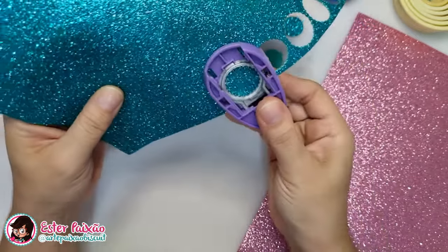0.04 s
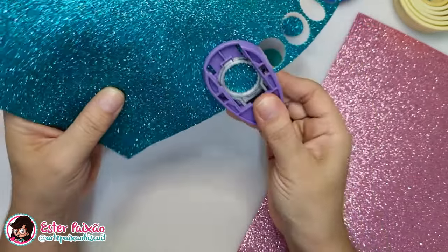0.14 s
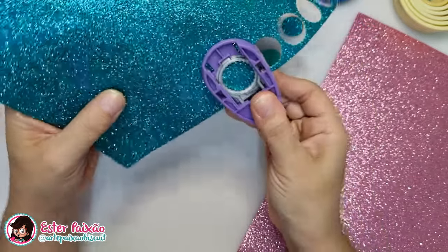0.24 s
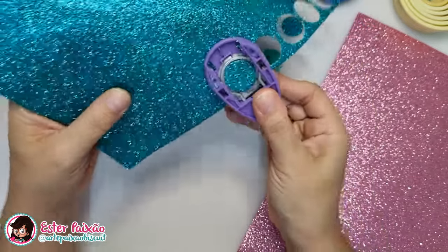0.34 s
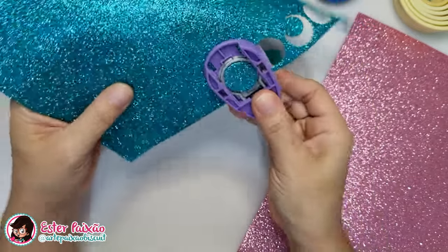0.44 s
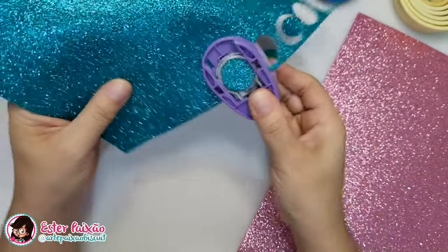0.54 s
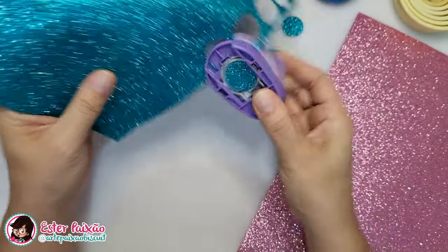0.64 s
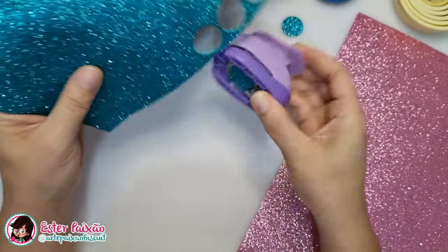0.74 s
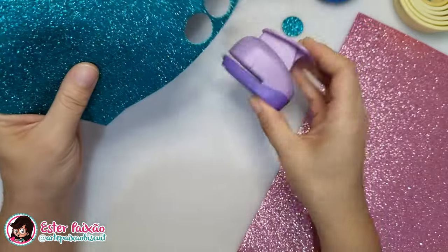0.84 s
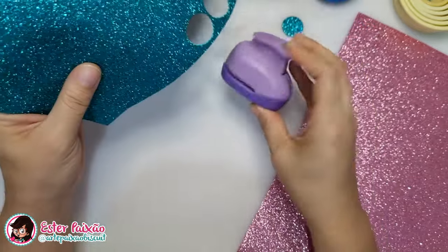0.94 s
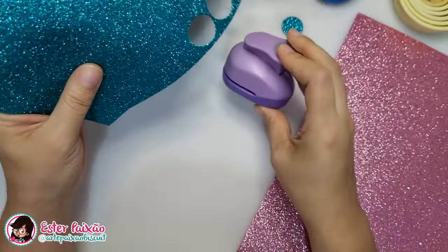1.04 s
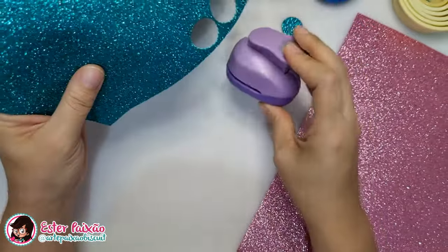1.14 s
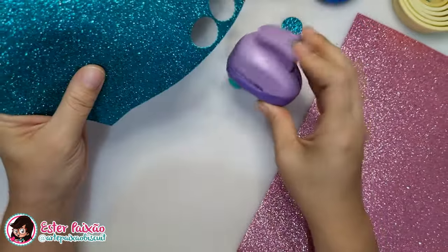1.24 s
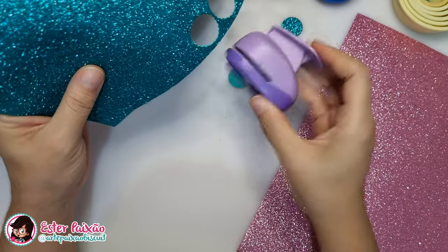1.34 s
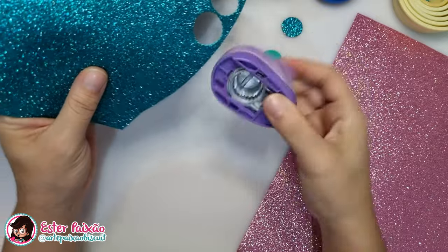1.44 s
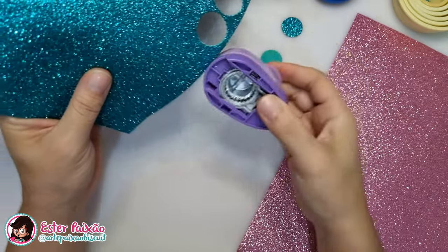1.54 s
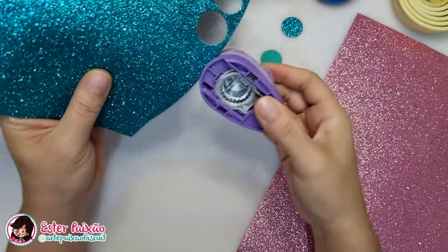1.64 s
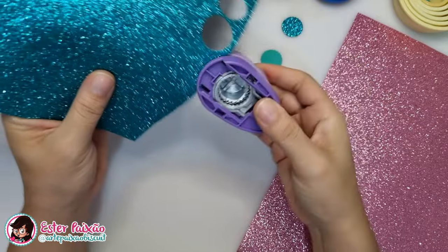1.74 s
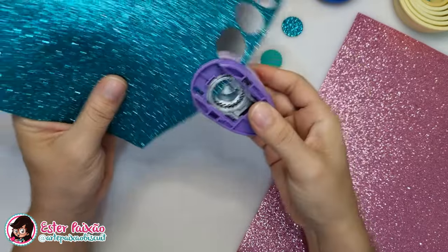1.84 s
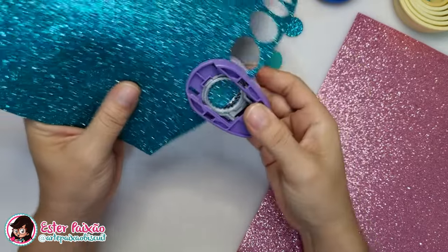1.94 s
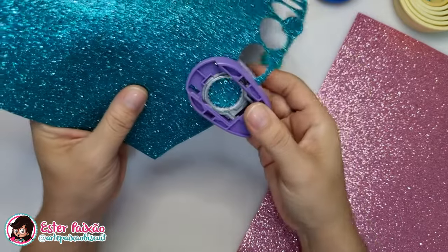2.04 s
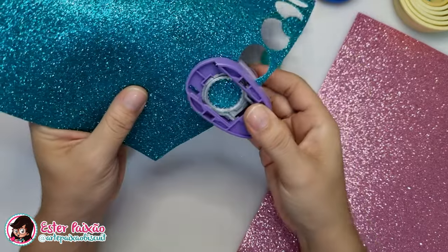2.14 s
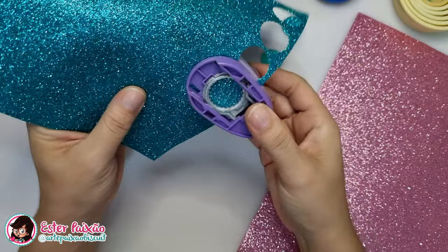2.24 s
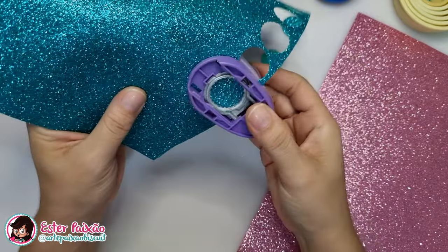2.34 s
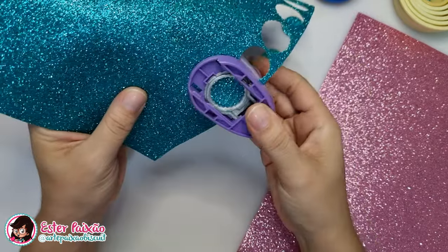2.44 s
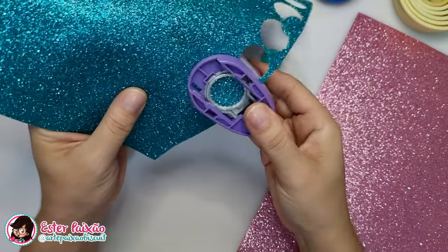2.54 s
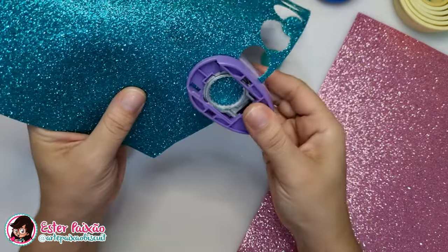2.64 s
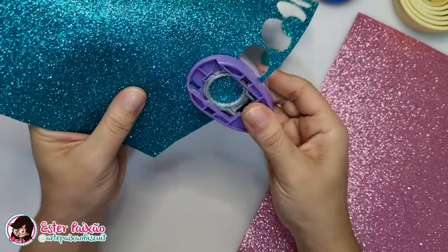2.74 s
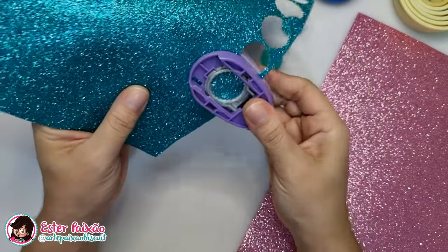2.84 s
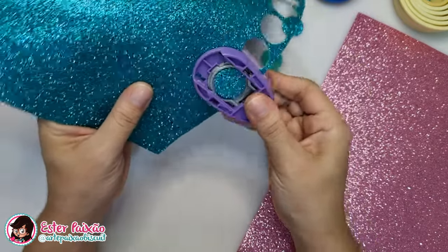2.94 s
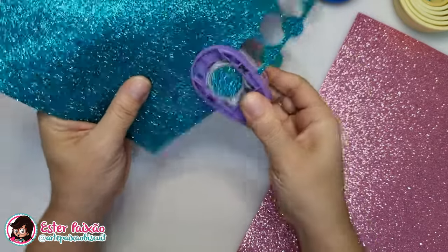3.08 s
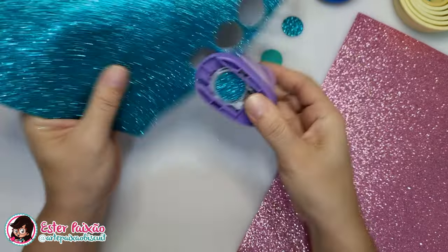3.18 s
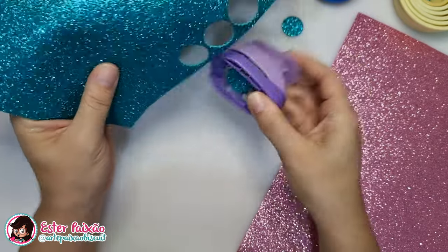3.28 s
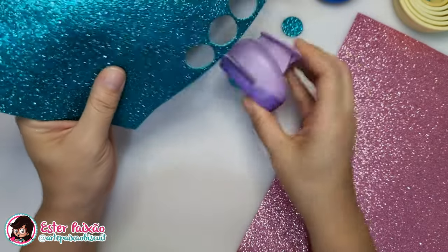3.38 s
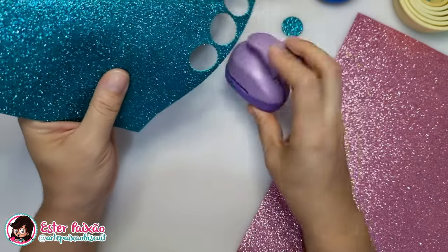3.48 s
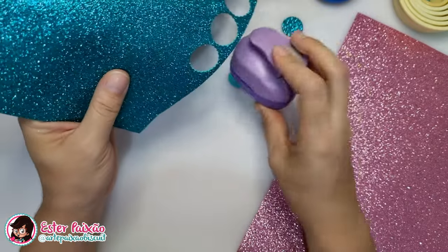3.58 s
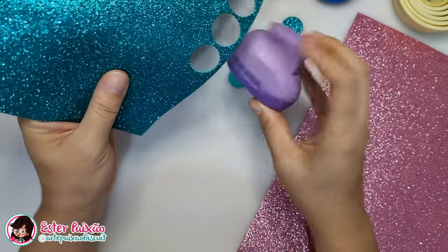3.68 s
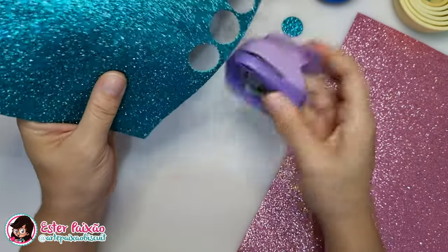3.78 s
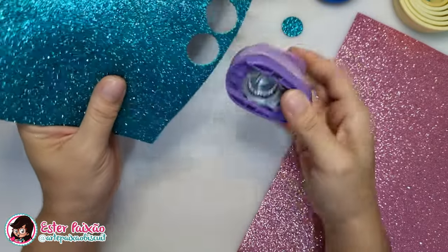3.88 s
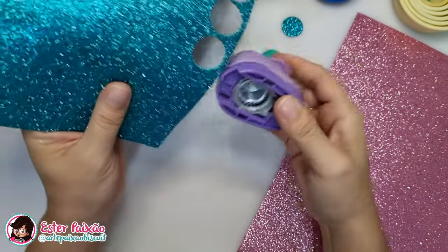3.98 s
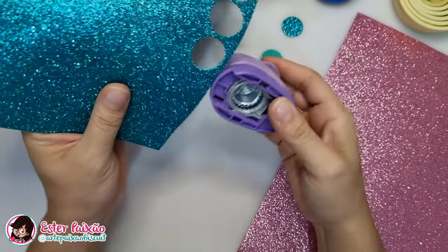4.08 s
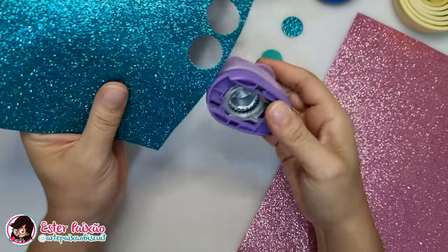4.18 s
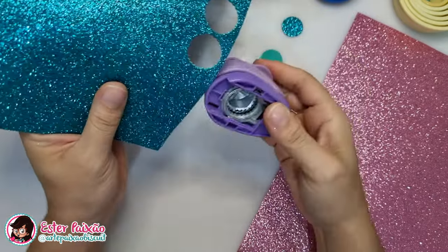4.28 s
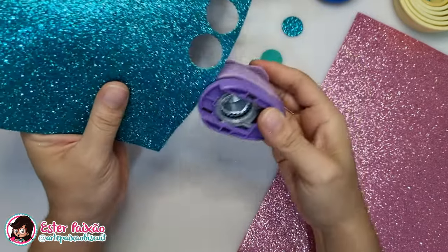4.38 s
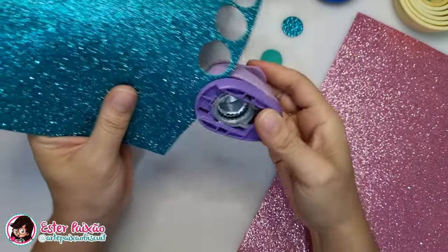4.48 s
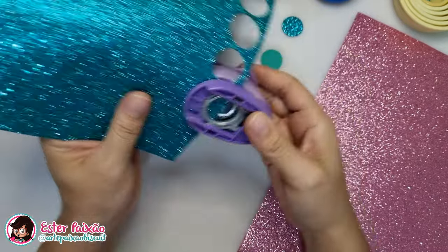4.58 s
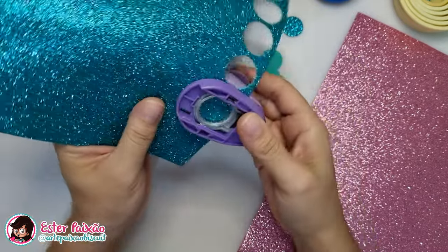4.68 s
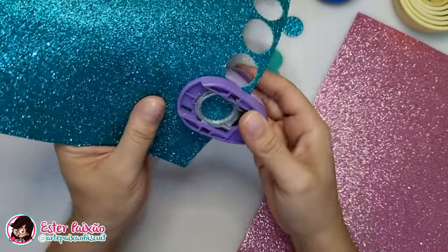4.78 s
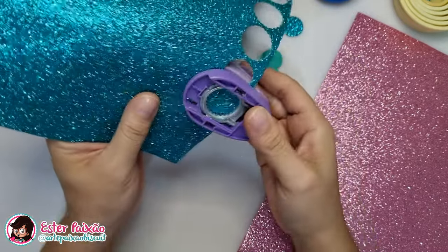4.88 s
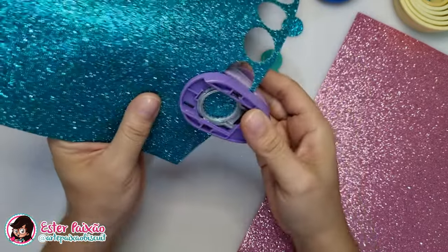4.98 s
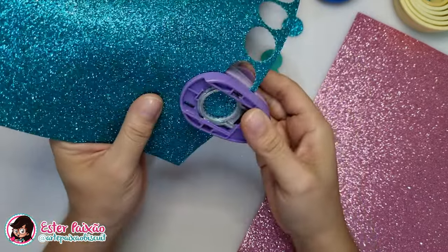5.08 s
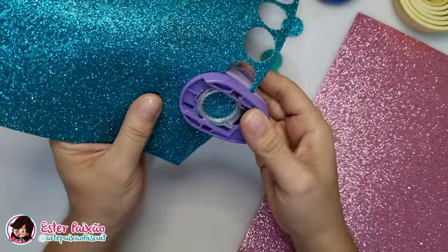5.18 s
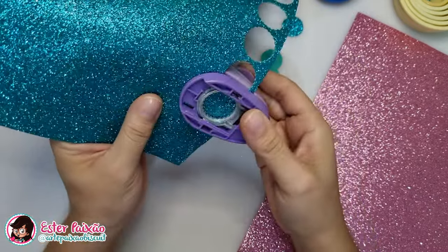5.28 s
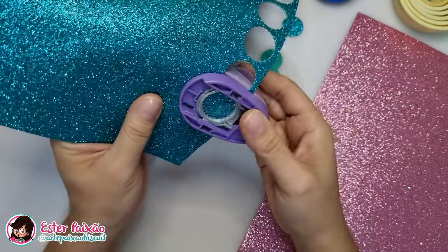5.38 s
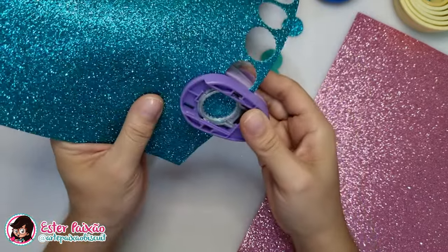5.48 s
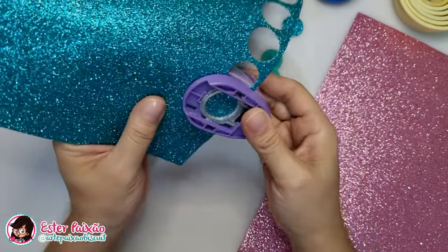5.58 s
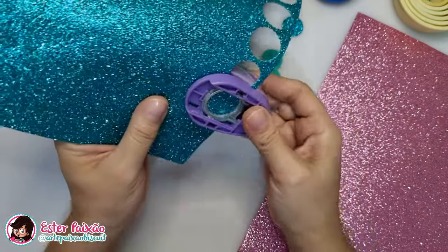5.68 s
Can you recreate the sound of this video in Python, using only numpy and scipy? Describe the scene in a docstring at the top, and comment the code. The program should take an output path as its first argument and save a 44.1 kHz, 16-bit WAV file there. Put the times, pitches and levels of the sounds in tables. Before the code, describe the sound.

A handheld plastic lever punch creaks with small ticks, snaps sharply through a glitter foam sheet and springs back with a hollow click. The rough sheet scrapes through the slot, then the creak, snap and spring-back come a second time. More hissy scraping and a few faint ticks follow. The microphone is close above a desk in a small quiet room.

```python
"""A desk in a small quiet room, a phone microphone close above a plastic lever punch.
Twice the lever creaks, the die snaps a circle out of a glitter foam sheet and the lever springs back,
ringing the hollow housing. Between cuts the rough sheet scrapes through the slot of the punch.
The room rings briefly and the desk bumps softly; the hush sinks after each snap and creeps back."""
import sys
import numpy as np
from scipy import signal
from scipy.fft import rfft, irfft
from scipy.io import wavfile
from scipy.ndimage import uniform_filter1d

SR = 44100
rng = np.random.default_rng(int(sys.argv[2]) if len(sys.argv) > 2 else 0)


def master_out(mix):
    """Clip the mix to full scale and print it as 16-bit PCM to the path in sys.argv[1]."""
    frames = np.transpose(np.atleast_2d(mix))
    ceiling = np.clip(frames, -1, 1)
    pcm = np.round(ceiling * 32767).astype(np.int16)
    wavfile.write(sys.argv[1], SR, pcm)


N = 252252


def gain(db):
    """Decibels to amplitude."""
    return 10 ** (np.asarray(db) / 20)


def unit_rms(x):
    """Scales to rms 1."""
    return x / np.sqrt(np.mean(x ** 2) + 1e-20)


def curve_at(points, hz):
    """Reads a table on a log-frequency axis."""
    points_hz, values = np.transpose(points)
    return np.interp(np.log(hz + 1), np.log(points_hz + 1), values)


def coloured(x, spectrum):
    """Filters x by a table of freq_hz, level_db."""
    hz = np.fft.rfftfreq(len(x), 1 / SR)
    return irfft(rfft(x) * gain(curve_at(spectrum, hz)), len(x))


def add(track, start_s, sound):
    """Mixes a sound into a track."""
    part = track[round(start_s * SR):][:len(sound)]
    part += sound[:len(part)]


def resonate(x, hz, width_hz):
    """A resonance of gain 1: shifts hz down to zero, smooths and shifts back."""
    carrier = np.exp(2j * np.pi * hz * np.arange(1, len(x) + 1) / SR)
    pole = np.exp(-np.pi * width_hz / SR)
    return 2 * (carrier * signal.lfilter([1 - pole], [1, -pole], x / carrier)).real


def peak(x, hz, width_hz):
    """The same resonance twice for steeper skirts, rms 1."""
    return unit_rms(resonate(resonate(x, hz, width_hz), hz, width_hz))


def ring(x, modes):
    """Resonances summed with alternating sign, rms 1."""
    return unit_rms(sum((-1) ** k * gain(db) * resonate(x, hz, width_hz)
                        for k, (hz, width_hz, db) in enumerate(modes)))


def band(x, low_hz, high_hz):
    """Steep band-pass, rms 1."""
    return unit_rms(signal.sosfilt(signal.butter(3, [low_hz, high_hz], "band", fs=SR, output="sos"), x))


def grit(count, spread_db, grain_samples):
    """Noise whose level jumps as grains catch and let go, rms 1."""
    jumps = np.repeat(rng.exponential(1, count // grain_samples + 1), grain_samples)[:count]
    return unit_rms(rng.standard_normal(count) * gain(spread_db * np.minimum(jumps, 5)))


# Room tone all around the microphone: freq_hz, level_db
HUSH_SPECTRUM = [(15, -69.5), (25, -31), (70, -15.5), (108, 0.5), (212, -20.5), (242, -1.5), (326, -22.5),
                 (439, -5), (560, -10.5), (624, -9), (1020, -7.5), (1100, -8.5), (1480, -13.5), (2300, -25),
                 (3250, -29.5), (6300, -34), (7500, -40.5), (16000, -45)]
# Its level, sinking as each cut ends and creeping back: time_s, level_db
HUSH_LEVELS = [(0.0, -53), (0.658, -52), (0.78, -60), (1.27, -65), (1.94, -59), (2.1, -54), (2.418, -54.5),
               (3.178, -49.5), (3.38, -54), (3.441, -62.5), (4.051, -64), (4.621, -56.5), (4.94, -51),
               (5.72, -52.5)]
def hush(patch_db=2.5, rumble_hz=160, rumble_share=0.37):
    """Room noise with drifting patches; the rumble follows the level curve only in part."""
    hop, size = 256, 1024
    frames, hz = N // hop + 5, np.fft.rfftfreq(size, 1 / SR)
    real, imag, patches = rng.standard_normal((frames, len(hz), 3)).T
    patches = uniform_filter1d(patches, size=3, axis=0)  # across frequency
    patches = unit_rms(uniform_filter1d(patches, size=24, axis=1))  # across time
    time_s, level_db = np.transpose(HUSH_LEVELS)
    floor_db = level_db.min()
    rise_db = np.interp(np.arange(frames) * hop / SR, time_s, level_db) - floor_db
    share = np.where(hz < rumble_hz, rumble_share, 1)
    spectrum_db = curve_at(HUSH_SPECTRUM, hz)[:, None] + patch_db * patches + np.outer(share, rise_db)
    noise = signal.istft((real + 1j * imag) * gain(spectrum_db), nperseg=size, noverlap=size - hop)[1]
    lull = noise[round(3.6 * SR):4 * SR]
    return noise[:N] * gain(floor_db) / np.std(lull)


# Decay of the small room, heard from the desk: freq_hz, t60_s
ROOM_DECAY = [(300, 0.16), (1500, 0.15), (5000, 0.11), (15000, 0.06)]
def room(x):
    """Sparse wall reflections of random sign, each band dying at its own speed."""
    taps = np.zeros(SR // 2)
    slots = np.arange(200, len(taps) - 20, 20)
    taps[slots + rng.integers(0, 20, len(slots))] = rng.choice([-1., 1.], len(slots))
    hz, t, spectrum = signal.stft(taps, SR, nperseg=256)
    decay = gain(-60 * t / curve_at(ROOM_DECAY, hz)[:, None])
    tail = signal.istft(spectrum * decay, SR, nperseg=256)[1]
    return signal.fftconvolve(x, tail / np.linalg.norm(tail))[:N]


# Soft bumps and hums from the desk under the microphone: start_s, level_db, pitch_hz, length_s
DESK_BUMPS = [(0.42, -67.5, 55, 0.075), (1.0, -57, 255, 0.1206), (1.45, -64.5, 460, 0.17),
              (2.0, -65.5, 55, .15), (3.0, -67.5, 50, .12), (3.02, -65.5, 150, 0.072),
              (5.24, -58, 63, 0.123), (5.62, -59.5, 58, 0.26)]
def desk_bump(start_s, level_db, pitch_hz, length_s):
    """The desk sounds one narrow low swell of noise."""
    noise = rng.standard_normal(round(length_s * SR))
    return start_s, gain(level_db) * peak(noise, pitch_hz, width_hz=30) * np.hanning(len(noise))


# Modes of the plastic punch, heard close up: pitch_hz, width_hz, level_db
HOUSING_MODES = [(1453, 110, -3.5), (1645, 180, 3.5), (1950, 150, -7.5), (3030, 130, -11), (3480, 93, -17),
                 (4067, 280, -5.5), (4680, 83, -6.5), (6800, 400, -5.5), (10260, 250, 2), (11130, 200, -7),
                 (13300, 1700, -1.5)]
def housing(drive, part):
    """The plastic shell rings in its hollow low modes, its bright upper ones, or all of them."""
    modes = {"hollow": HOUSING_MODES[:3], "bright": HOUSING_MODES[3:], "all": HOUSING_MODES}
    return ring(drive, modes[part])


# Modes of the glitter sheet in the slot: pitch_hz, width_hz, level_db
SHEET_MODES = [(3150, 200, -3.5), (3740, 250, 7), (4407, 1100, 3), (5816, 1300, 4), (7180, 350, 0),
               (8820, 1800, 1), (11140, 230, 2.5), (13900, 1400, 2)]
# Strokes of the sheet near the microphone; lower_db, housing_db and flap_db are relative to the hiss:
# full_s, rise_s, held_s, first_db, last_db, lower_db, housing_db, flap_db, flap_hz, sing1_hz, sing2_hz
SHEET_STROKES = [(0.045, .01, 0.073, -50, -65, -20, -13, -20, 810, 6700, 10200),
                 (0.31, 0.033, .03, -61, -65, -16, -6, 5, 840, 6700, 13900),
                 (0.38, .01, 0.081, -44, -56.5, -9, -9.5, -13, 740, 4100, 14600),
                 (0.673, .02, 0.052, -32.5, -45.5, 2, 5, -4.5, 940, 2490, 3880),
                 (0.739, .06, 0.051, -37.5, -32, -7.5, -1.5, -1, 605, 2220, 5500),
                 (0.811, .03, 0.074, -37, -40, -12, -1.5, -1, 789, 2400, 9400),
                 (1.335, .006, 0.055, -61.5, -75, 6.5, -1, -4, 666, 5200, 10130),
                 (1.98, .07, .11, -50.5, -35.5, -7.5, -10.5, -6.5, 587, 2600, 5490),
                 (2.105, .05, 0.12, -40.5, -47.5, -11.5, -17, 0, 583, 2570, 8850),
                 (2.41, .04, 0.049, -74.5, -70, 2.5, 4, 7, 684, 5980, 8320),
                 (2.69, .008, .085, -62, -64, 3, 1.5, 4, 752, 4430, 8940),
                 (3.208, 0.063, .1, -31.5, -32.5, -5, -2, -7.5, 603, 3230, 6020),
                 (3.34, .05, 0.035, -40, -37.5, -12, 0, -2, 928, 2300, 5770),
                 (3.42, .03, 0.1, -60, -77, -22, -14, 3.5, 708, 3410, 6530),
                 (4.17, .03, .13, -89.5, -88, 10, 4.5, 33.5, 602, 6080, 5900),
                 (4.497, .006, 0.037, -69.5, -78.5, 11, 5, 19.5, 557, 4544, 9180),
                 (4.754, .05, 0.054, -41.5, -35.5, -3, -7.5, -12, 749, 2670, 3380),
                 (4.98, .04, 0.049, -51.5, -40.5, -9, -18, -6, 610, 3290, 4630),
                 (5.09, .04, 0.066, -62.5, -50.5, -3, -17, -9.5, 658, 3200, 4610),
                 (5.66, .04, 0.032, -50.5, -47, -5, -10.5, -10, 733, 4910, 13820)]
def sheet_scrape(full_s, rise_s, held_s, first_db, last_db, lower_db, housing_db, flap_db,
                 flap_hz, sing1_hz, sing2_hz):
    """Glitter grains drag over the slot: hiss in the sheet modes, hollow housing, flapping sheet."""
    silent_db, fall_db_per_s, squeak_db, slot_lip_hz = -94.5, 504.5, -9.5, 2300
    t = np.arange(SR // 2) / SR
    fall_s = abs(last_db - silent_db) / fall_db_per_s
    corners_s = np.cumsum([0, rise_s, held_s, fall_s])
    hiss_db = np.interp(t, corners_s, [silent_db, first_db, last_db, silent_db])
    noise = grit(len(t), spread_db=1.0, grain_samples=24)
    sheet = ring(noise, SHEET_MODES) + 0.73 * noise
    for hz in (sing1_hz, sing2_hz):
        sheet += gain(squeak_db) * peak(noise, hz, width_hz=350)
    hiss = band(sheet, 6500, 20000) + gain(lower_db) * band(sheet, 1900, 6500)
    rasp = unit_rms(resonate(noise, slot_lip_hz, width_hz=290))
    hollow = band(noise, 1200, 2500) + 0.8 * housing(noise, "hollow") + 0.37 * rasp
    flap = 0.8 * band(noise, 450, 920) + peak(noise, flap_hz, width_hz=110)
    scrape = hiss + gain(housing_db) * unit_rms(hollow) + gain(flap_db) * unit_rms(flap)
    return max(full_s - rise_s, 0), (gain(hiss_db) - gain(silent_db)) * scrape


# Creaks, ticks and spring-backs of the lever, close up; ring_db is relative to level_db:
# peak_s, level_db, ring_db, bright_hz, ring_hz
LEVER_TICKS = [(0.0328, -44, -2.5, 6750, 1040), (0.1098, -25, -8.5, 15000, 1580),
               (0.1243, -14.5, -4.5, 8100, 1574), (0.1429, -20, -2, 8160, 1664),
               (0.1646, -21.5, 1.5, 12680, 1633), (0.1765, -18, -19, 14000, 1650),
               (0.2062, -28, -3, 12160, 1630), (0.356, -24.5, -5.5, 6994, 1560),
               (0.3666, -25.5, -13.5, 11700, 1950), (0.4501, -10, 0.5, 13040, 1510),
               (0.4646, -2, -5.5, 12000, 1568), (0.6463, -9, -7, 6194, 1840), (0.6703, -17, -2, 7040, 972),
               (1.329, -44.5, 6, 4700, 1756), (2.047, -33, -22, 8000, 1050),
               (2.099, -38.5, 6.5, 7600, 1540), (2.1565, -34, -22, 11300, 1340),
               (2.6826, -48.5, 11.5, 4170, 1500), (2.794, -17.5, -19, 14890, 1500),
               (2.8095, -24, -11.5, 14600, 1500), (2.8733, -18.5, -16.5, 8440, 1930),
               (2.8897, -26, 0, 4100, 1920), (2.9085, -32, 5, 8930, 1860), (2.9224, -24, -4, 15100, 1880),
               (2.975, -23.5, -1, 8970, 1750), (2.9936, -17, -5.7, 8640, 1588),
               (3.0011, -10, -7, 14360, 1563), (3.0195, -4.5, -1.5, 8920, 1530),
               (3.1823, -11, -5, 6693, 1820), (3.205, -16, 3, 6395, 1684),
               (3.2173, -21.5, 14.5, 6036, 1066), (4.4936, -51, 5.5, 5050, 1302),
               (4.798, -25, -3.5, 12900, 1670), (4.8106, -35.5, 7.5, 12900, 1693),
               (4.977, -51, -2, 14700, 967), (5.6055, -54.5, 8.5, 4810, 1465),
               (5.661, -38.5, 4, 5020, 1720), (5.688, -33.5, -9.5, 14300, 1660)]
def lever_tick(peak_s, level_db, ring_db, bright_hz, ring_hz):
    """A slip of the lever: a bright spit of noise, and the housing rings after it."""
    lead_s, rise_s, t60_s = 0.006, 0.0011, 0.019
    t = np.arange(6000) / SR - lead_s  # zero at the peak
    envelope = np.where(t < 0, np.exp(t / rise_s), gain(-60 * t / t60_s))
    noise = grit(len(t), spread_db=1.5, grain_samples=16)
    glint = unit_rms(resonate(noise, bright_hz, width_hz=900))
    spit = unit_rms(band(noise, 6200, 15000) + 1.7 * glint + 1.2 * housing(noise, "bright"))
    knock = unit_rms(resonate(noise, ring_hz, width_hz=500)) * envelope
    hollow = resonate(knock, ring_hz, width_hz=160)
    return peak_s - lead_s, gain(level_db) * (spit * envelope + gain(ring_db) * hollow)


# Wide noise of the crack at close range: freq_hz, level_db
CRACK_SPECTRUM = [(35, -62.5), (60, -52.5), (732, -19.5), (946, -24.5), (1620, 8.5), (2090, -9.5),
                  (3580, -9), (4640, -6.5), (14200, -8), (16000, -19)]
# The two cuts, right by the microphone; thud_db is relative to the rattle:
# start_s, level_db, held_s, t60_s, thud_db, thud_hz
DIE_SNAPS = [(.4615, -7, 0.035, 0.4, -21, 881), (3.0145, -8.5, 0.042, 0.38, -10.5, 790)]
def die_snap(start_s, level_db, held_s, t60_s, thud_db, thud_hz):
    """The die slams through: the whole punch rattles, then dies away; the sheet thuds under it."""
    rise_s, sag_db_per_s = 0.003, 45
    t = np.arange(SR // 2) / SR
    release_db = -60 * np.maximum(t - held_s, 0) / t60_s
    envelope = np.minimum(t / rise_s, 1) * gain(release_db - sag_db_per_s * t)
    noise = grit(len(t), spread_db=0.0, grain_samples=60)  # no spread: even noise
    crack = unit_rms(coloured(noise, CRACK_SPECTRUM))
    rattle = unit_rms(crack + 0.44 * housing(noise, "all"))
    thud = peak(noise, thud_hz, width_hz=340) * gain(thud_db - 73 * t)
    hollow = housing(noise, "hollow") * gain(-24.5 + 23 * np.minimum(t, 0.15))  # outlasts the rattle
    return start_s, gain(level_db) * envelope * (rattle + thud + hollow)


def scene():
    """Everything reaches both microphones alike; the lever and the sheet also ring the room."""
    background = hush()
    lever, snaps, sheet = np.zeros((3, N))
    for row in LEVER_TICKS:
        add(lever, *lever_tick(*row))
    for row in DIE_SNAPS:
        add(snaps, *die_snap(*row))
    for row in DESK_BUMPS:
        add(background, *desk_bump(*row))
    for row in SHEET_STROKES:
        add(sheet, *sheet_scrape(*row))
    reflections = room(gain(-4.5) * lever + gain(-14) * sheet)
    return np.tile(background + reflections + sheet + lever + snaps, (2, 1))


def record(dry):
    """The phone's two ports differ mostly in the bass, the left a little louder."""
    bass_cut_hz, treble_edge_hz = 48, 15850
    mid = signal.sosfilt(signal.butter(4, bass_cut_hz, "high", fs=SR, output="sos"), dry[0])
    side = port_difference(mid)
    pair = 0.94 * np.tanh(np.array([mid + side, mid - side]) / 1.236)  # soft ceiling
    low_pass = signal.firwin(511, treble_edge_hz, window=("kaiser", 9), fs=SR)
    return signal.oaconvolve(pair, low_pass[None], "same")


# Side relative to mid at the phone's microphone ports: freq_hz, level_db
SIDE_SPECTRUM = [(40, -8), (150, -10.5), (300, -14), (600, -46), (1200, -62.5), (3000, -53.5),
                 (10000, -61.5)]
def port_difference(mid):
    """The side signal: mostly the bass of the sound and of a delayed copy."""
    return coloured(0.57 * mid + 0.8 * np.roll(mid, 300), SIDE_SPECTRUM)


dry = scene()
out = record(dry)
master_out(out)
```